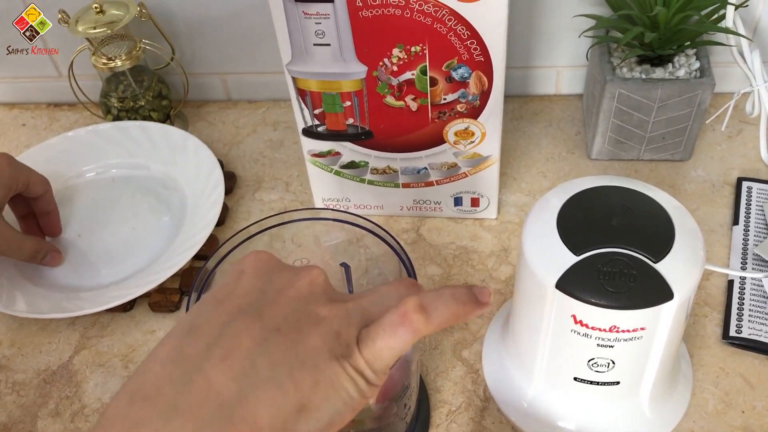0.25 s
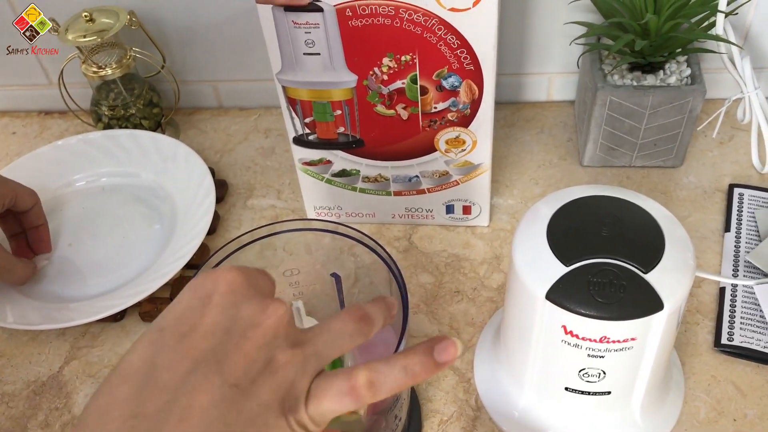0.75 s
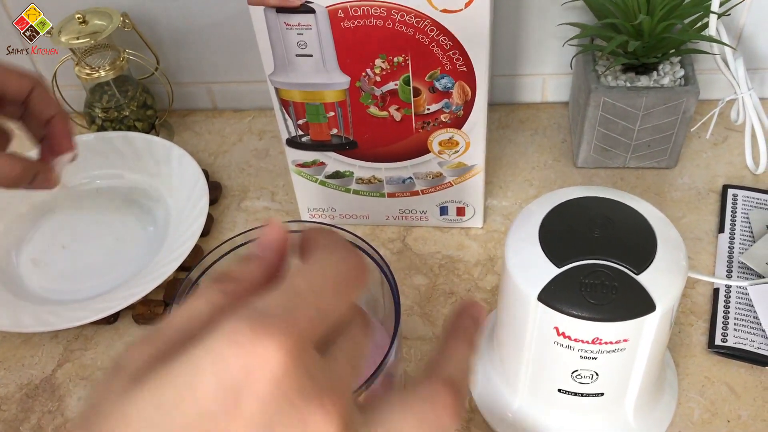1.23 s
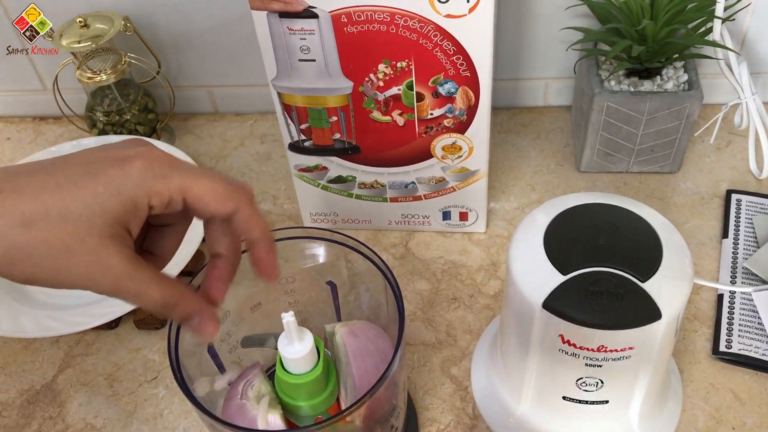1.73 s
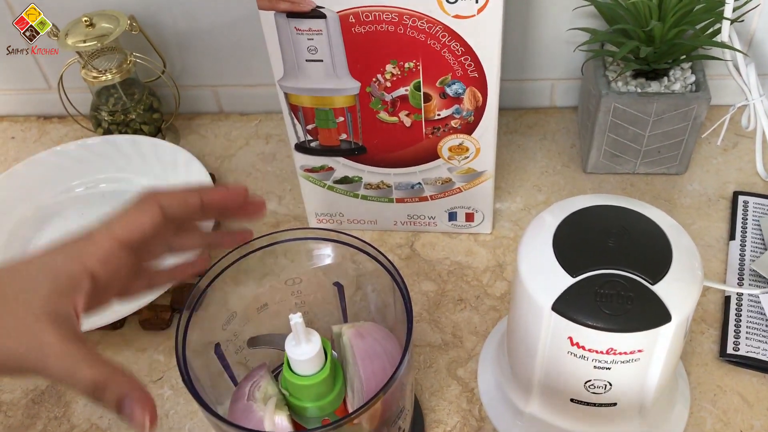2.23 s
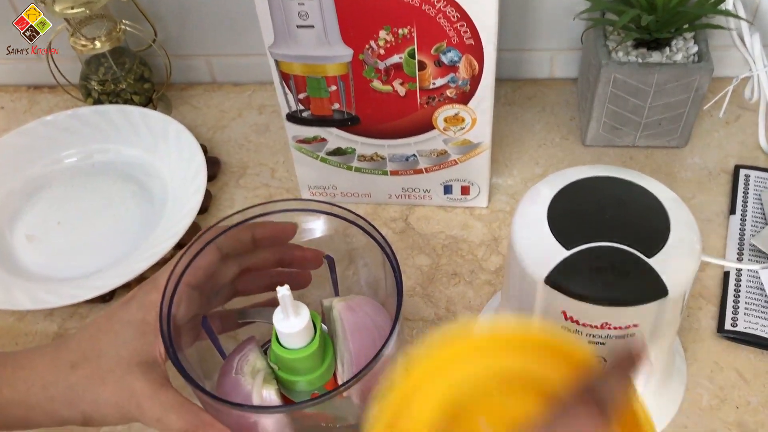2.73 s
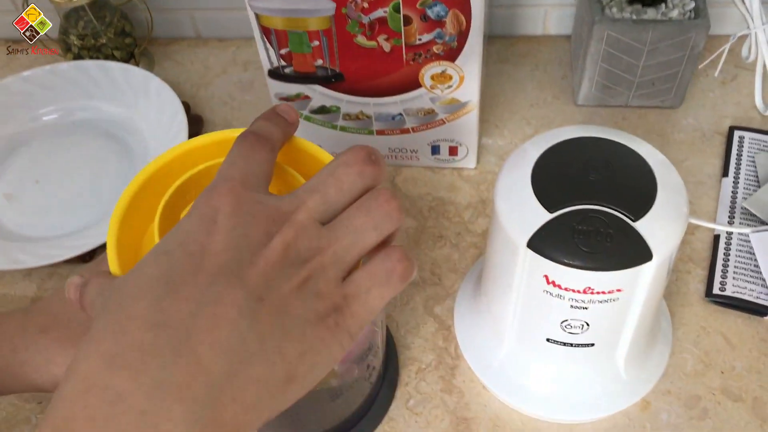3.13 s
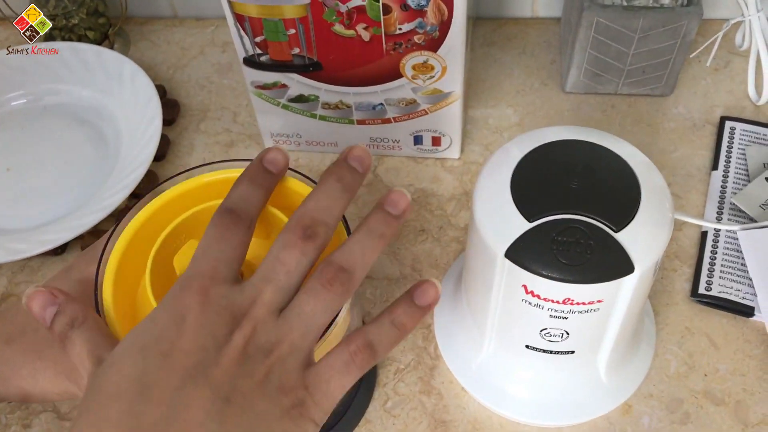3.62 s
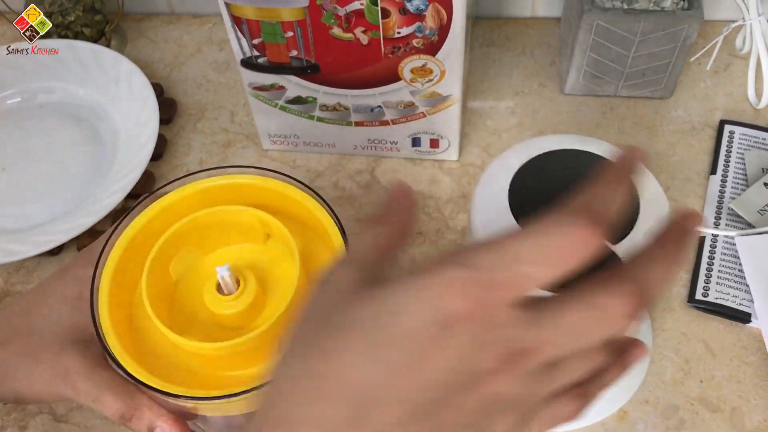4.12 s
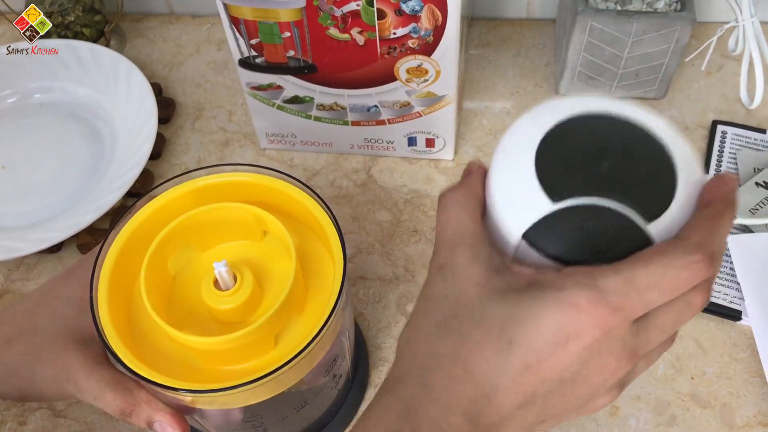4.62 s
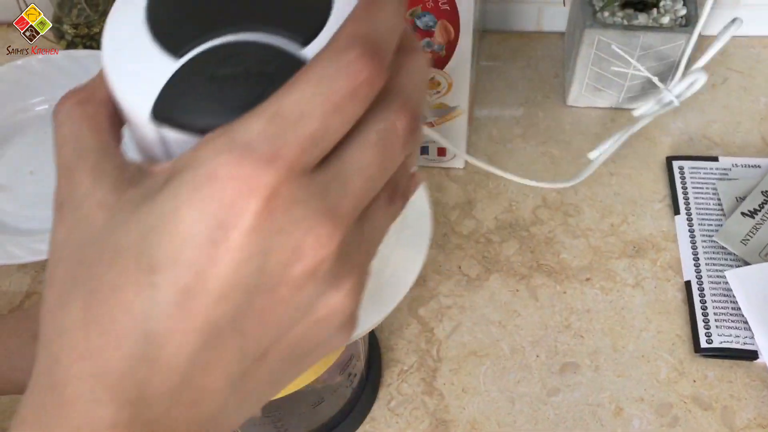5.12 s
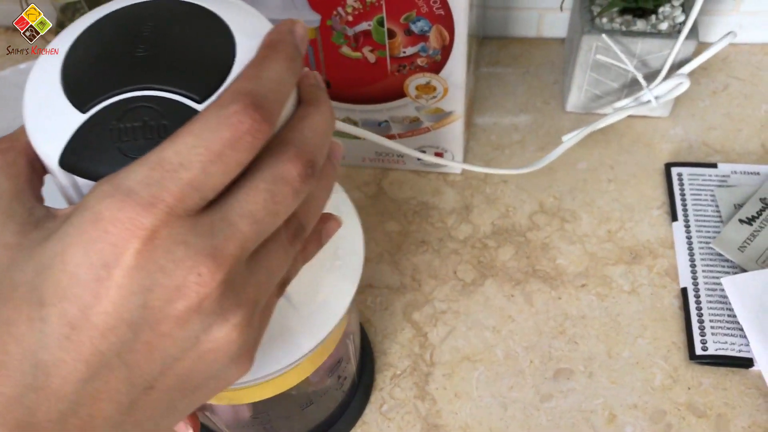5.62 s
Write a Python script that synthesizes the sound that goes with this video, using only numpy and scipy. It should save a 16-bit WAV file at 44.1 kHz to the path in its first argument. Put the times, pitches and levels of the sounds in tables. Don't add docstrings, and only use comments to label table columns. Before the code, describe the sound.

On a hard kitchen counter, a hand taps a plate with dull ceramic knocks, then small onion pieces tick into a plastic jar. A loud hard plastic knock marks the lid being picked up; it is pressed on with a double clack. Skin rubs softly, a motor housing bumps into place and ends with a heavy clunk. A faint low drone runs throughout; close phone microphone, short room tail.

```python
import sys
import numpy as np
from scipy import signal
from scipy.fft import rfft, irfft
from scipy.io import wavfile
from scipy.ndimage import uniform_filter1d, minimum_filter1d

SR = 44100
rng = np.random.default_rng(int(sys.argv[2]) if len(sys.argv) > 2 else 0)


def nominal_scale(level):
    x = np.asarray(level, float) / 20
    return 10 ** x


def inscribe(sig):
    pcm = np.round(np.clip(np.atleast_2d(sig).T, -1, 1) * 32767)
    wavfile.write(sys.argv[1], SR, pcm.astype(np.int16))


N = 258426


def level(x, db):
    return x * nominal_scale(db) / np.sqrt(np.mean(x ** 2))


def peak1(x):
    return x / np.abs(x).max()


def band(x, lo_hz, hi_hz, order=2):
    sos = signal.butter(order, [lo_hz, min(hi_hz, 0.47 * SR)], "bandpass", fs=SR, output="sos")
    return signal.sosfilt(sos, x)


def curve(table):
    s, *columns = np.transpose(table)
    return [np.interp(np.arange(N) / SR, s, column) for column in columns]


def walk(rate_hz):
    hold = int(SR / rate_hz)
    steps = np.repeat(rng.standard_normal(N // hold + 1), hold)
    return 1.7 * uniform_filter1d(uniform_filter1d(steps, hold), hold)[:N]


# start_s, pitch_hz, level_db
MAIN_ROTOR = [
    (0, 69.3, -34.9),
    (4.5, 69.3, -34.9),
    (5.5, 69.3, -36.6),
    (5.86, 69.3, -36.6),
]
# start_s, pitch_hz, level_db
LOW_RUMBLE = [(0.0, 58.71, -50.2), (0.34, 56.87, -47.5), (0.69, 56.97, -46.3), (1.03, 58.58, -50.5),
              (1.38, 57.18, -44.0), (1.72, 57.23, -46.3), (2.07, 58.73, -50.9), (2.41, 57.05, -44.2),
              (2.76, 57.74, -53.8), (3.1, 58.78, -49.5), (3.45, 57.58, -45.8), (3.79, 60.95, -66.9),
              (4.14, 57.47, -37.0), (4.48, 58.04, -42.9), (4.83, 57.11, -55.0), (5.17, 57.68, -41.2),
              (5.52, 56.68, -55.4), (5.86, 57.48, -48.6)]


def drone():
    main_hz, main_db = curve(MAIN_ROTOR)
    second_hz, second_db = curve(LOW_RUMBLE)
    main = nominal_scale(main_db + 0.39 * walk(4.2)) * np.sin(2 * np.pi * np.cumsum(main_hz) / SR)
    second = nominal_scale(np.clip(second_db, -58, -41)) * np.sin(2 * np.pi * np.cumsum(second_hz) / SR)
    return np.sqrt(2) * (main + second)


# freq_hz, density_db (per Hz)
AIR_SPECTRUM = [(75, 3.5), (110, 1), (200, -8.5), (340, -5), (500, -11.5), (620, -6.5), (1100, -7),
                (1250, -10.5), (2000, -18), (3200, -31.5), (4900, -45.5), (5600, -33), (9000, -50),
                (16000, -38)]
# freq_hz, width_hz, level_db
DUCT_RESONANCES = [(42.7, 2, -52), (49, 8.6, -51.5), (66.8, 4.1, -53.5), (117.3, 22, -53.5),
                   (169.3, 10.3, -58), (261.4, 17, -61), (722, 15, -65.5), (1080, 95, -58), (2490, 14, -73),
                   (3010, 38, -72.5), (4270, 12, -80.5), (5600, 53, -77), (6190, 12, -75),
                   (6610, 40, -77.5), (3386, 40, -77.5), (7770, 81, -79), (9070, 72, -85)]
# above_hz, start_s, duration_s, change_db
HAND_SHADE = (2300, 3.3, .3, -6)


def turbulence():
    hz, db = np.transpose(AIR_SPECTRUM)
    log_hz = np.log(np.arange(N // 2 + 1) * SR / N + 1)
    spectrum = rfft(rng.standard_normal(N)) * nominal_scale(np.interp(log_hz, np.log(hz), db))
    swell, air = walk(1.0), 0
    for centre_hz in 80 * 2 ** np.arange(0, 8, 0.5):
        share = np.clip(1 - np.abs(log_hz - np.log(centre_hz)) / np.log(np.sqrt(2)), 0, 1)
        air = air + nominal_scale(0.43 * swell + 1.23 * walk(9.6)) * irfft(spectrum * share, N)
    return level(air, -47.5)


def duct_whine():
    above_hz, from_s, over_s, shade_db = HAND_SHADE
    shade = shade_db * np.clip((np.arange(N) / SR - from_s) / over_s, 0, 1)
    whine = 0
    for hz, width_hz, db in DUCT_RESONANCES:
        noise = band(rng.standard_normal(N), hz - width_hz / 2, hz + width_hz / 2, order=1)
        whine = whine + nominal_scale(1.15 * walk(2.99) + shade * (hz > above_hz)) * level(noise, db)
    return whine


# start_s, firmest_s, end_s, level_db, brightness_db
RUB_STROKES = [(0, -0.005, 0.031, -55.5, -6), (0.466, .48, .505, -65.5, 11), (0.502, 0.514, 0.57, -67, 5.5),
               (0.555, 0.585, 0.69, -63, -4), (0.752, 0.797, 0.79, -59, -3), (2.008, 2.066, 2.1, -53, -1),
               (2.097, 2.13, 2.26, -60, -6), (2.336, 2.37, 2.44, -59, -2), (3.0, 3.024, 3.18, -60.5, -8),
               (3.312, 3.394, 4.1, -57, -5), (3.457, 3.58, 3.8, -56, -15), (3.775, 3.9, 3.98, -58, -3),
               (3.9, 3.965, 3.982, -54, -1), (4.14, 4.31, 4.65, -60, -7), (4.507, 4.595, 4.87, -55.5, -8.5),
               (4.856, 4.88, 5.06, -56, -7), (4.948, 5.044, 5.2, -53, -4), (5.01, 5.077, 5.14, -49, 2.5),
               (5.145, 5.17, 6, -62, -11), (5.308, 5.427, 5.6, -57.5, -12),
               (5.512, 5.845, 6.74, -59.5, -17)]


def rubbing():
    edge_s, swell_db = 0.012, 7
    t, rub, bright = np.arange(N) / SR, np.zeros(N), np.zeros(N)
    for start, firm, end, db, bright_db in RUB_STROKES:
        touch = np.clip(np.minimum(t - start, end - t) / edge_s + 0.5, 0, 1)
        pressure_db = np.interp(t, [start, firm, end], [-swell_db, 0, -swell_db])
        stroke = touch * nominal_scale(db + pressure_db)
        rub = np.maximum(rub, stroke)
        bright = np.maximum(bright, stroke * nominal_scale(bright_db))
    slips = 1 + (rng.random(N) < 0.004) * nominal_scale(19 + 2.5 * rng.exponential(size=N))
    hiss = rng.standard_normal(N) * uniform_filter1d(slips, size=30) * nominal_scale(1.2 * walk(60))
    return rub * level(band(hiss, 1600, 7900), 0) + bright * level(band(hiss, 6270, 14700), 0)


KNOCK_EDGES = (110, 700, 4000, 8000, 16400)


def knocks(hits, modes, note_db, note_s, ring_db, treble_ring_db, chatter_s, crack_s, low_db, top_db, blur_hz=50):
    out, t = np.zeros(N + SR), np.arange(SR // 8) / SR
    floor, low, mid, high, top = KNOCK_EDGES
    for s, body_db, note_hz, hard_db in hits:
        hz, db, t60 = np.transpose([*modes, (note_hz, note_db, note_s)])[:, :, None]
        spot_level, spot_pitch = rng.standard_normal((2, len(hz), 1))
        drift = np.cumsum(rng.standard_normal((len(hz), len(t))), axis=1)
        waver = drift * np.sqrt(2 * np.pi * blur_hz * hz / 2000 / SR)
        decay = nominal_scale(db + 2 * spot_level) * 1000. ** (-t / t60)
        ring = (decay * np.sin(2 * np.pi * hz * (1 + 0.0068 * spot_pitch) * t + waver)).sum(axis=0)
        chatter = rng.standard_normal(len(t)) ** 3 * np.exp(-t / chatter_s)
        chatter[0] = 8
        tone = signal.fftconvolve(chatter, ring)[:len(t)]
        crack = rng.standard_normal(len(t)) * (np.exp(-t / crack_s) + 1.38 * np.exp(-t / 0.00018))
        first = int(s * SR)
        for lo, hi, share_db, tone_db in ((floor, low, low_db, ring_db),
                                          (low, mid, 0, ring_db),
                                          (mid, high, hard_db, treble_ring_db),
                                          (high, top, hard_db + top_db, treble_ring_db)):
            tone_part, crack_part = band(np.array([tone, crack]), lo, hi, order=3)
            part = nominal_scale(tone_db) * peak1(tone_part) + peak1(crack_part)
            out[first:first + len(t)] += peak1(part) * nominal_scale(body_db + share_db)
    return out[:N]


# start_s, strength_db, pitch_hz, hardness_db (treble over body)
BANGLE_BLOWS = [
    (0.187, -43, 4520, -7),
    (0.192, -41, 4520, 5),
]
# freq_hz, level_db, t60_s
BANGLE_MODES = [(2490, 12, 0.021), (4520, -6, 0.13), (7340, -8, 0.074), (8980, 2, 0.024), (11530, 2, 0.048),
                (15000, -9, .03)]


def bangle():
    return knocks(BANGLE_BLOWS, BANGLE_MODES, note_db=-1, note_s=0.091, ring_db=-11, treble_ring_db=2,
                  chatter_s=0.0056, crack_s=0.0031, low_db=-15, top_db=-8, blur_hz=3.5)


# start_s, strength_db, pitch_hz, hardness_db
FINGER_TICKS = [(0.235, -37, 2250, -5), (0.285, -46, 1050, -14), (0.439, -55, 690, -8),
                (0.464, -51, 1000, -4), (0.477, -46, 1100, -22), (0.496, -46, 1080, -15),
                (0.511, -52, 1030, -10), (0.522, -46, 740, -7), (0.59, -44, 1000, -9),
                (0.672, -48, 750, -6), (1.34, -60, 1036, 0), (2.509, -46.5, 732, -10),
                (3.101, -47, 970, -11)]
# freq_hz, level_db, t60_s
JAR_MODES = [(387, -9.5, 0.037), (765, -11, 0.069), (1330, -0.5, .03), (2250, -2, 0.018), (4220, -14, 0.03),
             (11000, 14, 0.027)]


def fingertip_ticks():
    return knocks(FINGER_TICKS, JAR_MODES, note_db=3, note_s=0.02, ring_db=0, treble_ring_db=-15,
                  chatter_s=0.0022, crack_s=0.004, low_db=-9, top_db=10)


# start_s, strength_db, pitch_hz, hardness_db
PLATE_BLOWS = [(0.242, -24, 2250, -13.5), (0.255, -32, 2870, -13), (0.53, -40.5, 2240, -13),
               (0.748, -29, 1450, -17), (0.799, -24.5, 1420, -23), (0.812, -28, 2260, -33),
               (0.835, -32, 2280, -27), (0.849, -15.5, 1570, -23.5), (0.886, -38, 700, -30),
               (1.62, -32, 1600, -30), (1.669, -50, 1040, -17)]
# freq_hz, level_db, t60_s
PLATE_MODES = [(623, 7.5, 0.085), (712.4, 1.5, 0.16), (1320, -9, 0.2), (1394, 3.5, 0.06),
               (1585, -1.5, 0.064), (1943, -1, 0.061), (2280, -2.5, 0.062), (6290, 3, 0.037)]


def plate():
    return knocks(PLATE_BLOWS, PLATE_MODES, note_db=11.5, note_s=0.025, ring_db=39, treble_ring_db=2,
                  chatter_s=0.005, crack_s=0.0059, low_db=-22.5, top_db=-7, blur_hz=25)


# start_s, strength_db, pitch_hz, hardness_db
PIECE_BLOWS = [(0.86, -39, 736, -7), (1.106, -54, 1130, 13), (1.131, -46, 840, 17.5),
               (1.368, -47, 756, -20), (1.762, -44, 1100, -19), (1.835, -45, 840, -20),
               (1.878, -44.5, 940, -25), (2.001, -34, 842, -8.5), (2.016, -32, 2400, -18),
               (2.023, -33, 2250, -18), (2.03, -37.5, 1000, 8.5), (2.051, -33, 2070, 17),
               (2.222, -38, 1050, 3.5), (2.263, -35, 735, -13), (2.278, -31.5, 1040, -32),
               (2.309, -35.5, 2450, -26)]


def dropped_pieces():
    return knocks(PIECE_BLOWS, JAR_MODES, note_db=-5.5, note_s=0.11, ring_db=10.0, treble_ring_db=-7.5,
                  chatter_s=0.0023, crack_s=0.005, low_db=-7, top_db=-6.5)


# start_s, strength_db, pitch_hz, hardness_db
LIFT_BLOWS = [
    (2.56, -6.5, 2750, -4),
    (2.565, -13.5, 1170, -18),
    (2.575, -11, 2220, -41),
    (2.582, -13, 2360, -12),
    (2.616, -33, 2600, -18),
]
# freq_hz, level_db, t60_s
LOOSE_LID_MODES = [(391, -6.5, 0.12), (756, -8.5, 0.098), (1036, -11, 0.2), (1360, -16, 0.038),
                   (1646, 0, 0.038), (2240, -13, 0.06), (2600, -5, 0.022), (3060, 5, 0.012),
                   (3300, 1.5, .015), (6130, 3, 0.014)]


def lid_lift():
    return knocks(LIFT_BLOWS, LOOSE_LID_MODES, note_db=9.5, note_s=0.019, ring_db=8.5, treble_ring_db=-1,
                  chatter_s=0.0016, crack_s=0.002, low_db=-24.5, top_db=1.5)


# start_s, strength_db, pitch_hz, hardness_db
SEAT_BLOWS = [(3.271, -47.5, 1047, 2.5), (3.352, -31.5, 945, -5.5), (3.484, -44, 1140, 3),
              (3.512, -21, 1440, -6), (3.575, -38, 727, 7.5), (3.598, -21, 1080, -3),
              (3.609, -9.5, 1390, -11), (3.612, -25, 2400, -27), (3.624, -23, 1360, -26),
              (3.634, -21.5, 1930, -22), (3.644, -10.5, 1370, -26)]
# freq_hz, level_db, t60_s
SEATED_LID_MODES = [(156, -2, 0.034), (268, -7, 0.071), (388, -15, 0.071), (590, 9, 0.02), (970, 1, 0.0085),
                    (1170, -1.5, 0.021), (1370, -8, 0.085), (1656, 2.5, 0.015), (2400, -5, 0.058),
                    (3550, -13, 0.017)]


def lid_seating():
    return knocks(SEAT_BLOWS, SEATED_LID_MODES, note_db=9.5, note_s=0.014, ring_db=7.5, treble_ring_db=2,
                  chatter_s=0.0027, crack_s=0.0068, low_db=-10, top_db=-7)


# start_s, strength_db, pitch_hz, hardness_db
HOUSING_BLOWS = [(4.385, -37, 896, -10), (4.429, -40.5, 826, -6), (4.831, -47, 1140, -21),
                 (4.869, -50, 810, -19), (4.922, -41.5, 735, 0), (5.379, -20.5, 2970, -32),
                 (5.385, -37, 727, -5), (5.539, -34.5, 937, -34), (5.69, -33.5, 1040, -17),
                 (5.714, -34, 1140, -24), (5.725, -27.5, 1120, -4.5)]
# freq_hz, level_db, t60_s
HOUSING_MODES = [(168, -1.5, 0.06), (245, -9, 0.037), (392, 1.5, 0.038), (532, 5, 0.02), (696, 0, 0.041),
                 (1050, 2, 0.026), (1386, -7.5, 0.028), (1800, -0.5, 0.008), (2070, -3.5, .02),
                 (3100, -10, 0.0082), (8250, -20, .008)]


def motor_housing():
    return knocks(HOUSING_BLOWS, HOUSING_MODES, note_db=-6, note_s=0.0067, ring_db=11, treble_ring_db=0,
                  chatter_s=0.0032, crack_s=0.005, low_db=-6, top_db=-9)


# start_s, strength_db, pitch_hz, hardness_db
CLUNK_BLOWS = [
    (5.763, -9, 967, -9),
    (5.765, -19, 2070, 1),
    (5.776, -28, 700, 13.5),
]


def housing_clunk():
    return knocks(CLUNK_BLOWS, HOUSING_MODES, note_db=2, note_s=0.027, ring_db=10.5, treble_ring_db=-13,
                  chatter_s=0.0029, crack_s=0.0029, low_db=-9, top_db=-6.5)


# freq_hz, t60_s, level_db
ROOM_DECAY = [(202, 0.57, -19.5), (445, 0.4, -21), (980, 0.69, -23), (1950, 0.62, -20.5),
              (4430, 0.38, -21.5), (8200, 0.32, -22), (13000, .18, -35)]


def walls(x, count=3):
    t, out = np.arange(SR // 2) / SR, 0
    body = band(x, 60, 3800)
    build_up = np.clip(t / 0.0029, 0, 1)
    for _ in range(count):
        tail = 0
        for hz, t60, db in ROOM_DECAY:
            echoes = band(rng.standard_normal(len(t)), hz / 1.81, hz * 1.68)
            tail = tail + level(echoes * 1000. ** (-t / t60), db)
        facing = body + (x - body) * np.sign(walk(350))
        out = out + signal.fftconvolve(facing, tail * build_up / np.sqrt(count * len(t)))[:N]
    return out


def scene():
    appliance = drone() + turbulence() + duct_whine()
    near = bangle() + fingertip_ticks() + plate() + dropped_pieces()
    near = near + lid_lift() + lid_seating() + motor_housing() + housing_clunk()
    return (appliance + rubbing() + near + walls(near))[None]


def starve(x, lo_hz, hi_hz):
    sos = signal.butter(3, [lo_hz, hi_hz], "bandpass", fs=SR, output="sos")
    part = signal.sosfiltfilt(sos, x)
    envelope, reach = uniform_filter1d(np.abs(part), size=44), int(0.013 * SR)
    coming = -minimum_filter1d(-envelope, size=reach, origin=-(reach // 2))
    faint = 1. * (envelope < coming * nominal_scale(-39))
    return x - part * uniform_filter1d(faint, size=44)


# freq_hz, width_hz, depth (0-1)
PORT_NOTCH = (10400, 630, 0.44)


def band_limit(x):
    return signal.sosfilt(signal.butter(12, 16650, fs=SR, output="sos"), x)


def record(dry):
    hz, width_hz, depth = PORT_NOTCH
    mix = dry - depth * band(dry, hz - width_hz / 2, hz + width_hz / 2, order=1)
    mix = signal.sosfilt(signal.butter(2, 36, "highpass", fs=SR, output="sos"), mix)
    mix = signal.sosfilt(signal.ellip(5, 0.3, 25, 15800, fs=SR, output="sos"), mix)
    mix = signal.sosfilt(signal.ellip(10, 0.3, 80, 16500, fs=SR, output="sos"), mix)
    mix = starve(mix, 2800, 6800)
    mix = starve(mix, 6800, 17000)
    return band_limit(mix)


dry = scene()
out = record(dry)
inscribe(out)
```